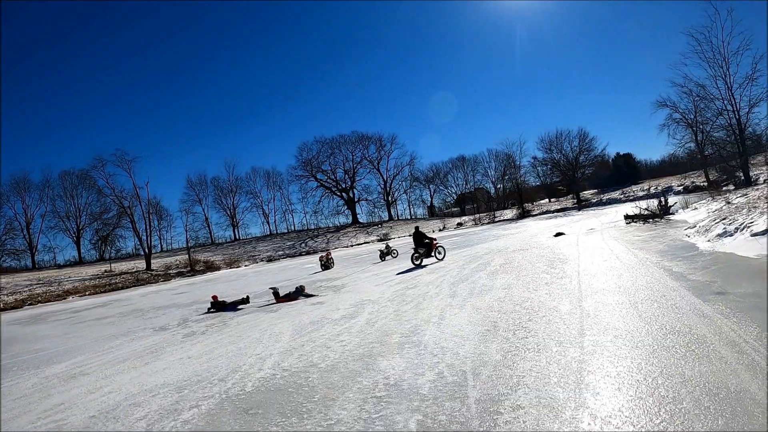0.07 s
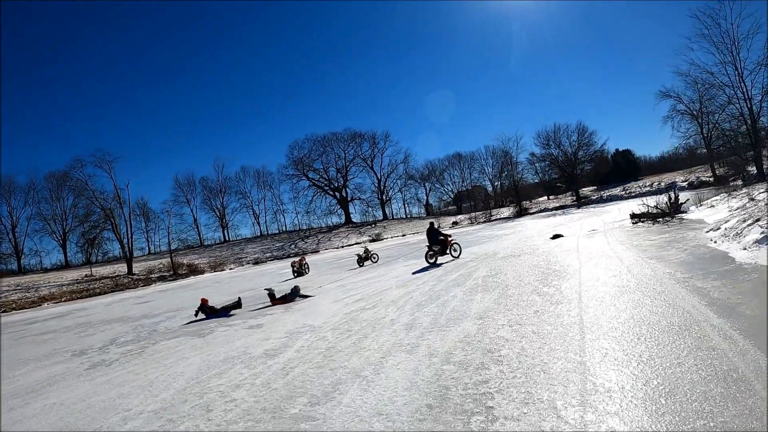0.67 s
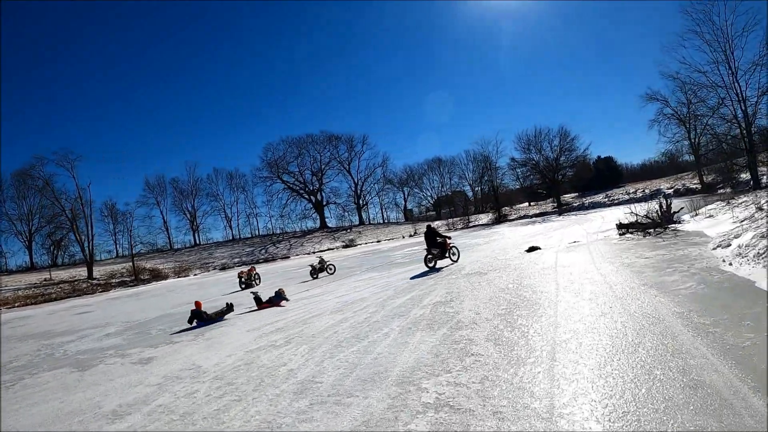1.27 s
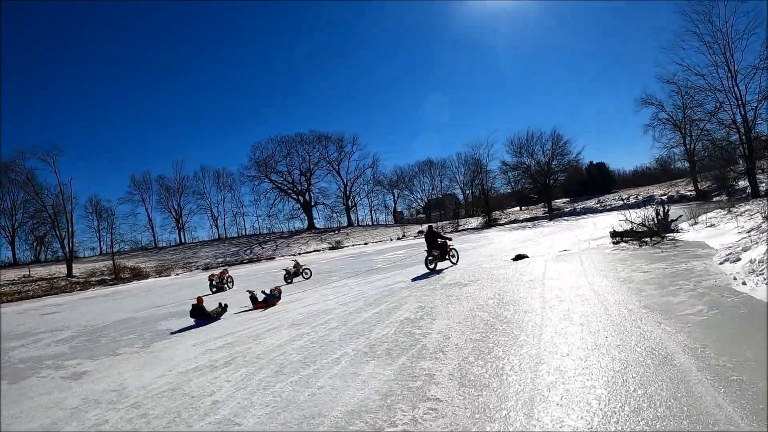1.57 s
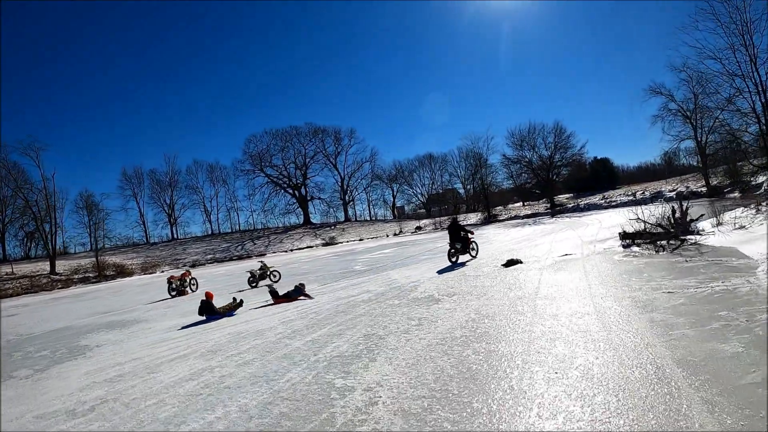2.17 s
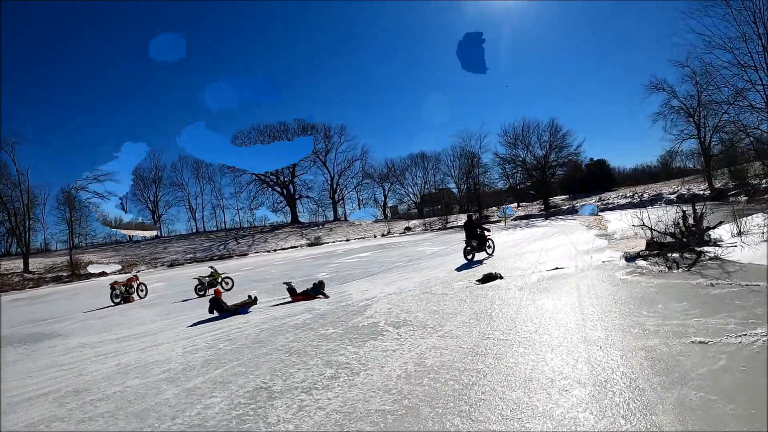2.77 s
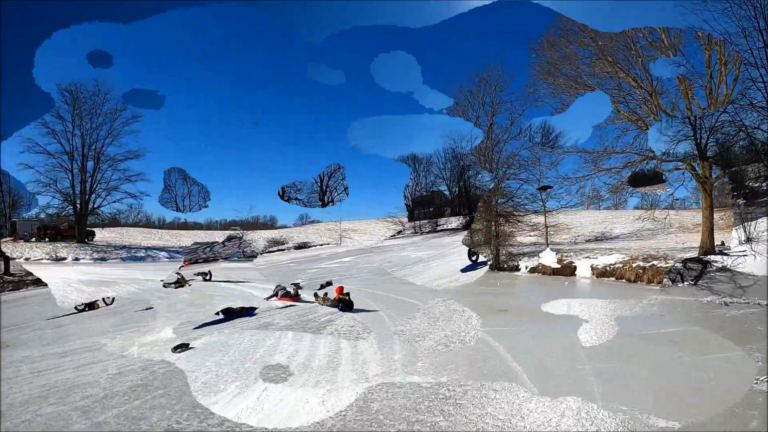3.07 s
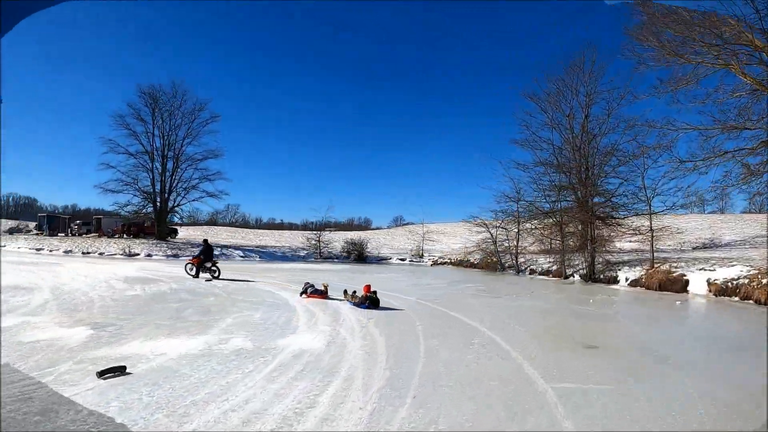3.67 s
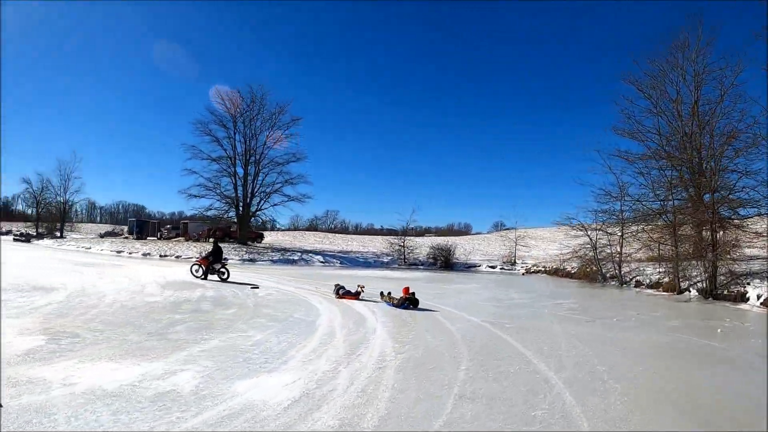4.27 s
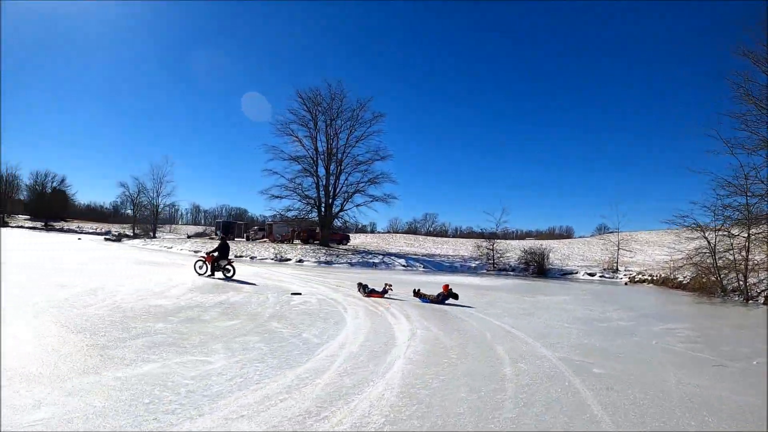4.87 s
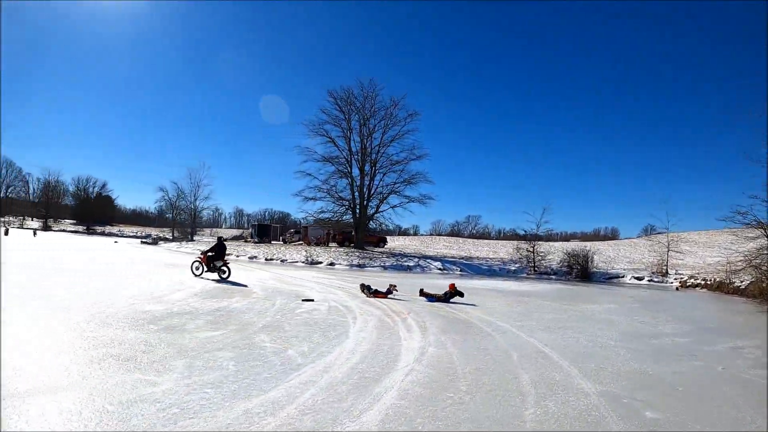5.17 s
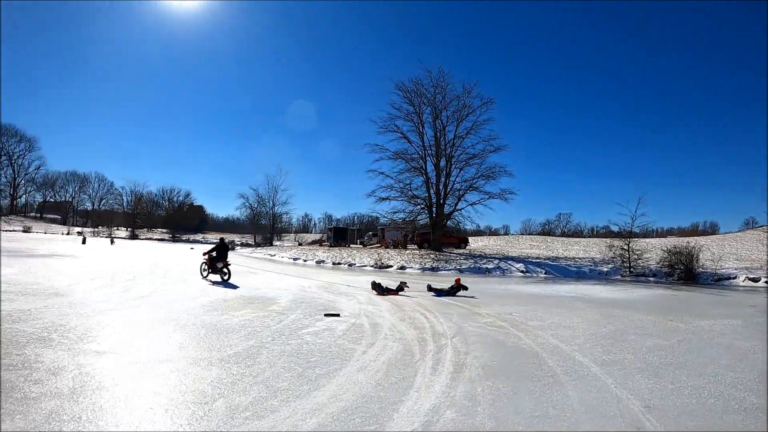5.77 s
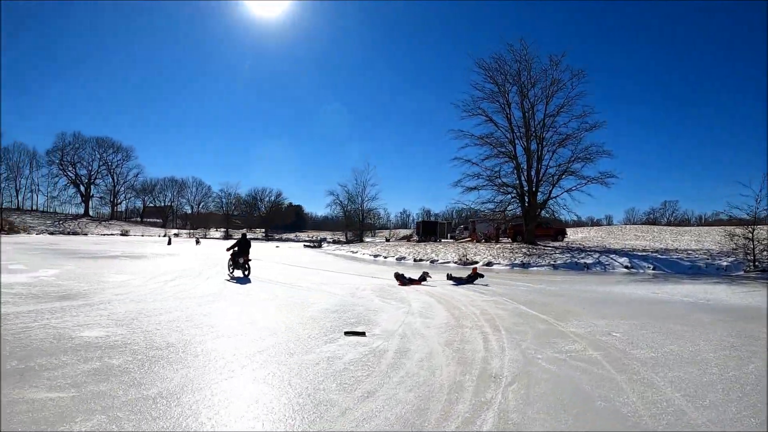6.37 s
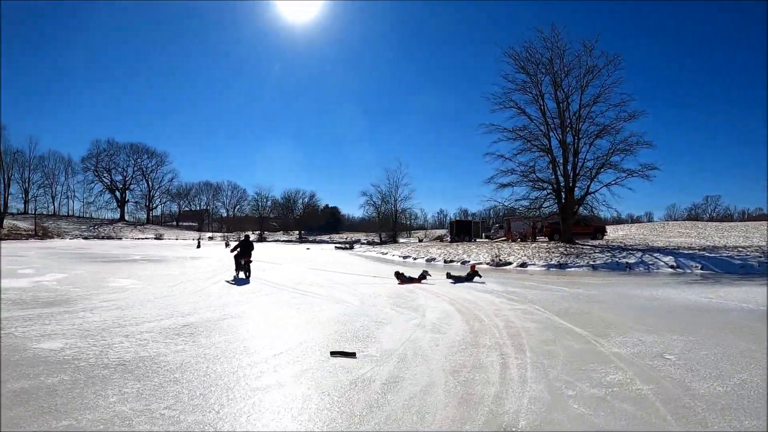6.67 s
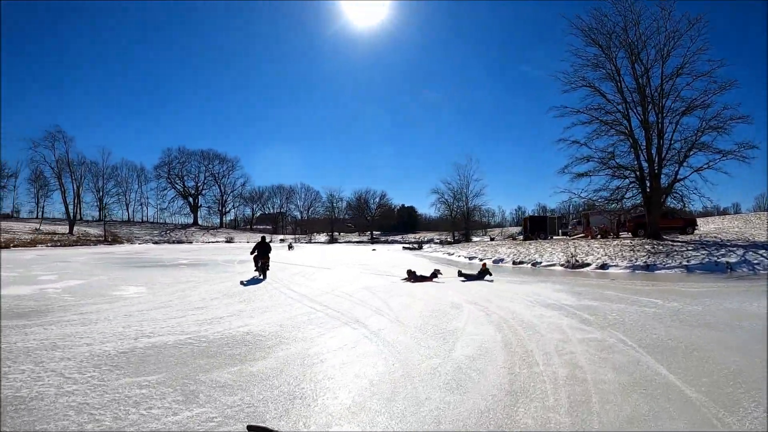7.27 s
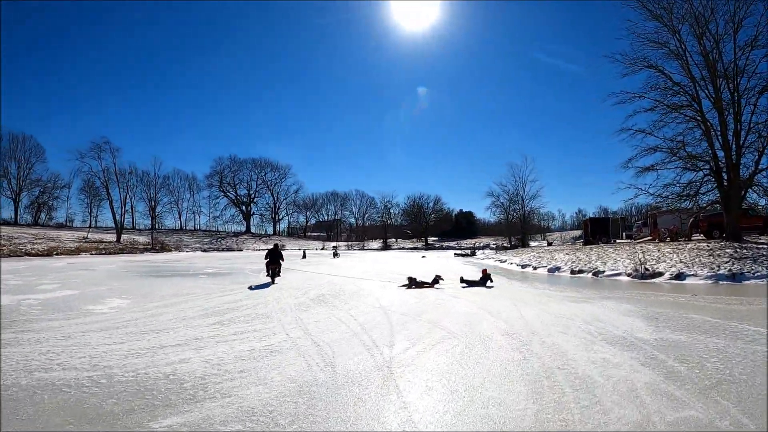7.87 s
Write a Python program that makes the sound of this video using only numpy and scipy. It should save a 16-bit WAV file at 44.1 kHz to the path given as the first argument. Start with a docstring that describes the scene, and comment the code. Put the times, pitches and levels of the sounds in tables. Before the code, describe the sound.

A small motorcycle engine thumps and clatters close up, tyres crunching and squeaking on ice as wind buffets the microphone.

```python
"""A small four-stroke single circles a frozen pond, heard from the rider's seat.
From the start the exhaust thumps about 19 times a second, the engine clatters, and the tyres roar,
crunch and squeak on the ice in a steady wind. Chips snap off, bumps knock the frame, gusts buffet
the microphone. At 2.76 s the ride jumps, with a faint tick, to a faster lap of 22-24 firings a second.
The gusts end soon after 4 s; around 6 s the roar peaks and short tones sink through it."""
import sys
import numpy as np
from scipy import signal
from scipy.fft import rfft, irfft, next_fast_len
from scipy.io import wavfile

SR = 44100
rng = np.random.default_rng(int(sys.argv[2]) if len(sys.argv) > 2 else 0)


def to_wav(s):
    """Save 16-bit WAV."""
    ch = np.atleast_2d(s).T  # columns
    pcm = np.round(np.clip(ch, -1, 1) * 32767)  # PCM
    wavfile.write(sys.argv[1], SR, pcm.astype(np.int16))


N = 353682
TIME_S = np.arange(N) / SR
FFT_SIZE = next_fast_len(N)
BIN_HZ = np.fft.rfftfreq(FFT_SIZE, 1 / SR)
JUMP_S = 2.7563
OPPOSITE_EARS = np.array([[1], [-1]])


def from_db(db):
    """Decibels to gain."""
    return 10 ** (np.asarray(db) / 20)


def unit_rms(x):
    """Scale to unit power."""
    return x / np.sqrt(np.mean(x ** 2) + 1e-20)


def curves(rows):
    """Each value column of a time table at every sample."""
    times_s, *columns = np.transpose(rows)
    return [np.interp(TIME_S, times_s, column) for column in columns]


def per_lap(slow, fast):
    """One value before the jump, another after it."""
    return np.where(TIME_S < JUMP_S, slow, fast)


def swell(start_s, length_s, attack_s, release_s):
    """Trapezoid from 0 to 1, released after length_s, confined to the lap that holds its middle."""
    t = TIME_S - start_s
    on_slow_lap = start_s + length_s / 2 < JUMP_S
    envelope = np.clip(np.minimum(t / attack_s, 1 - (t - length_s) / release_s), 0, 1)
    return envelope * per_lap(on_slow_lap, not on_slow_lap)


def bin_gains(spectrum):
    """A (Hz, dB) table as a gain per frequency bin."""
    hz, db = np.transpose(spectrum)
    return from_db(np.interp(np.log(BIN_HZ + 1), np.log(hz), db))


def coloured(x, spectrum):
    """Filter by a (Hz, dB) table, with steep skirts beyond its ends; unit power."""
    hz = BIN_HZ + 1
    skirts = np.minimum(1, np.minimum(hz / spectrum[0][0], spectrum[-1][0] / hz)) ** 8
    return unit_rms(irfft(rfft(x, FFT_SIZE) * bin_gains(spectrum) * skirts, FFT_SIZE)[..., :N])


def coloured_per_lap(x, slow_spectrum, fast_spectrum):
    """One colour on each lap."""
    return per_lap(coloured(x, slow_spectrum), coloured(x, fast_spectrum))


def drift(rate_hz):
    """Smooth random curve of unit power that changes at about rate_hz."""
    step, settle = 40, 2000
    pole = np.exp(-2 * np.pi * rate_hz * step / SR)
    noise = rng.standard_normal(N // step + settle + 2)
    slow = signal.lfilter([1], [1, -2 * pole, pole * pole], noise)[settle:]
    return np.interp(np.arange(N) / step, np.arange(len(slow)), unit_rms(slow))


def resonance(hz, width_hz):
    """Two-pole band-pass with unit peak gain."""
    r = np.exp(-np.pi * width_hz / SR)
    return np.array([1, 0, -1]) * (1 - r * r) / 2, [1, -2 * r * np.cos(2 * np.pi * hz / SR), r * r]


def moving_ring(drive, hz, width_hz, block=256):
    """A resonance whose centre follows a curve; unit power."""
    out, state = np.zeros((2, N)), np.zeros((2, 2))
    for i in range(0, N, block):
        b, a = resonance(hz[i], width_hz)
        out[:, i:i + block], state = signal.lfilter(b, a, drive[:, i:i + block], zi=state)
    return unit_rms(out)


def impulses(turns):
    """A unit click whenever turns rises past a whole number."""
    return (np.diff(np.floor(turns), prepend=np.floor(turns[0])) > 0) * 1.


def grains(per_s, spread_db):
    """Two independent streams of tiny clicks of uneven size; unit power."""
    sizes = from_db(spread_db * np.minimum(rng.exponential(1, (2, N)), 4))
    signs = rng.choice([-1, 1], (2, N))
    return unit_rms(sizes * signs * (rng.random((2, N)) < per_s / SR))


# Each row: time in seconds, firings per second.
FIRING_RATE = [(0.0, 19.072), (0.7, 18.63), (1.4, 18.226), (2.1, 17.873), (2.75, 17.768), (2.77, 22.109),
               (3.2, 22.486), (3.6, 22.649), (4.1, 22.744), (4.6, 23.33), (5.05, 23.806), (5.5, 23.328),
               (6.0, 23.135), (6.5, 22.862), (6.95, 22.83), (7.3, 22.122), (7.7, 22.019), (8.02, 21.569)]


def engine_cycles(first_firing_cycles=.576, skipped_cycles=.469):
    """Running count of cycles, each one firing and two crank turns; the jump skips part of one."""
    firings_per_s, = curves(FIRING_RATE)
    return np.cumsum(firings_per_s) / SR - first_firing_cycles - per_lap(0, skipped_cycles)


# Each row: time in seconds, relative pulse strength in dB.
THROTTLE_CURVE = [(0, 1.5), (1.2, 1), (2.7, -1.5), (3.3, 0), (3.6, 3), (4.4, 1.7), (5.2, 1.4), (6, -1.5),
                  (6.9, 0.2), (8, 1)]
# Silencer and airbox modes per lap. Each row: centre in Hz, width in Hz, gain in dB, polarity.
SLOW_PIPE_MODES = [(76, 15, 2.8, -1), (110, 45, -6.5, 1), (189, 11, -6.5, -1), (211, 30, -6.5, -1),
                   (260, 120, -0.2, 1)]
FAST_PIPE_MODES = [(82, 10, 2.3, -1), (112, 34, -1.7, 1), (138, 11, -9.4, 1), (226, 32, -2.6, 1),
                   (252, 20, -8, 1), (292, 75, 2.1, -1)]


def exhaust(cycle, gain_db=0.2, puff_s=0.0009, uneven_db=0.4, wander_cycles=0.004):
    """One rounded puff of gas per firing, never quite on time, rings the silencer and airbox."""
    throttle_db, = curves(THROTTLE_CURVE)
    firings = impulses(cycle + wander_cycles * drift(9.2))
    firings *= from_db(gain_db + throttle_db + uneven_db * rng.standard_normal(N))
    puff = np.exp(-.5 * (np.arange(-256, 257) / SR / puff_s) ** 2)
    flow = signal.fftconvolve(firings, puff, "same")

    def pipe(modes):
        return sum(polarity * from_db(db) * signal.lfilter(*resonance(hz, width_hz), flow)
                   for hz, width_hz, db, polarity in modes)

    return per_lap(pipe(SLOW_PIPE_MODES), pipe(FAST_PIPE_MODES))


# Each row: time in seconds, relative level in dB, casing ring in Hz.
CLATTER_CURVE = [(0.0, -28.5, 1053), (0.65, -25, 1026), (1.1, -27, 970), (2.0, -23.5, 966),
                 (2.65, -24.5, 927), (2.9, -24, 950), (3.55, -24, 985), (3.85, -25, 993), (4.5, -24, 1015),
                 (5.7, -21, 1079), (6.35, -22.5, 1060), (6.85, -23, 1014), (8.02, -25, 1072)]
# Each row: frequency in Hz, relative level in dB.
CASING_SPECTRUM = [(650, -18.5), (820, -1.5), (920, 2), (1100, -0.5), (1200, -2.5), (1320, -8),
                   (1600, -12.5)]


def clatter(cycle, gain_db=-0.5, knock_db=-2, whine_db=-8, burst_db=1.4, per_cycle=8, play_cycles=.005):
    """Valves and piston knock at set crank angles, the chain rattles; both ring the whining casing."""
    clatter_db, ring_hz = curves(CLATTER_CURVE)
    offsets = (np.arange(per_cycle) + rng.uniform(-.45, .45, per_cycle)) / per_cycle
    knocks = sum(impulses(cycle + offset + play_cycles * drift(20)) for offset in offsets)
    knocks *= from_db(2 * rng.standard_normal(N))
    impacts = grains(per_s=3000, spread_db=2.5)   # chain
    impacts[0] += from_db(knock_db) * unit_rms(knocks)
    whine = moving_ring(grains(per_s=3000, spread_db=2), ring_hz, width_hz=95)
    rattle = moving_ring(from_db(burst_db * drift(30)) * impacts, ring_hz, width_hz=250)
    casing = coloured(rattle + from_db(whine_db) * whine, CASING_SPECTRUM)
    return from_db(gain_db + clatter_db) * casing / np.std(casing[0])


# Each row: start in seconds, length in seconds, scrape loss in dB.
SMOOTH_PATCHES = [(1.988, 0.65, 4), (6.551, 0.73, 5)]


def smooth_loss_db(release_s):
    """Scrape lost while the tyre runs over smooth ice."""
    return sum(db * swell(start_s, length_s, attack_s=0.17, release_s=release_s)
               for start_s, length_s, db in SMOOTH_PATCHES)


def dulled(crunch, corner_hz=1550):
    """Smooth ice takes the top off the crunch, which is slow to return."""
    low = signal.sosfiltfilt(signal.butter(6, corner_hz, fs=SR, output="sos"), crunch)
    return low + (crunch - low) * from_db(-1.75 * smooth_loss_db(release_s=1))


# Each row: start in seconds, length in seconds, scrape level in dB, spray level in dB.
TYRE_SLIDES = [(-0.1, 0.92, -42.5, -55), (0.317, 0.25, -42.5, -51.5), (1.38, 0.06, -48, -54.5),
               (1.589, 0.19, -44, -52), (1.625, 0.16, -44.5, -53), (1.824, 0.11, -40.5, -53),
               (2.603, 2.4, -63, -53.5), (5.723, 0.25, -49, -59.5), (7.299, 0.53, -53.5, -63.5)]


def bite(sag_db_per_s=1.5, crunch_over_scrape_db=2.5):
    """Crunch, scrape and spray gains: down on smooth ice, up in slides; drive lifts the first two."""
    clatter_db, _ = curves(CLATTER_CURVE)
    drive_db = clatter_db - clatter_db.mean()
    loss_db = smooth_loss_db(release_s=0.45)
    crunch = from_db(per_lap(-36, -33) + 0.76 * drive_db - 0.22 * loss_db)
    scrape = from_db(per_lap(-47.5, -47) + 0.34 * drive_db - loss_db)
    spray = from_db(per_lap(-58, -58.5) - 0.71 * loss_db)
    for start_s, length_s, scrape_db, spray_db in TYRE_SLIDES:
        slide = swell(start_s, length_s, attack_s=.06, release_s=0.13)
        slide *= from_db(-sag_db_per_s * (TIME_S - start_s))
        crunch = np.hypot(crunch, slide * from_db(scrape_db + crunch_over_scrape_db))
        scrape = np.hypot(scrape, slide * from_db(scrape_db))
        spray = np.hypot(spray, slide * from_db(spray_db))
    return crunch, scrape, spray


# Each row: time in seconds, tread roar level in dB.
ROAR_CURVE = [(0.0, -26.5), (0.85, -29.5), (1.1, -34.5), (1.9, -28.5), (2.6, -32), (2.8, -28.5),
              (4.4, -24.5), (6.0, -20.5), (6.6, -22), (7.1, -24.5), (8.02, -20.5)]
# Tyre noise on ice; SLOW and FAST are the laps. Each row: frequency in Hz, relative level in dB.
SLOW_ROAR_SPECTRUM = [(310, -17.5), (390, -5), (480, -4.5), (620, 1.5), (730, 2.5), (840, -2), (1000, -17)]
FAST_ROAR_SPECTRUM = [(310, -11), (390, -8.5), (470, -1.5), (600, 3), (730, 2), (850, -4), (1000, -9)]
SLOW_CRUNCH_SPECTRUM = [(1100, -9.5), (1320, -0.5), (1550, 1.5), (1900, 4.5), (2080, -4), (2250, -11.5),
                        (2500, -24)]
FAST_CRUNCH_SPECTRUM = [(1100, -17), (1320, -1.5), (1600, -1.5), (1880, -1.5), (2030, -8.5), (2250, -18.5),
                        (2500, -26)]
SCRAPE_SPECTRUM = [(2100, -14.5), (2450, -8.5), (2750, -1.5), (3000, 4), (3300, 4), (3600, 1.5), (3850, -2),
                   (4100, -18.5)]
SLOW_SPRAY_SPECTRUM = [(3800, -20), (4050, -7.5), (4250, 4), (4500, -1), (4700, 1.5), (5050, -5),
                       (5300, -5), (5600, -8), (5900, -7), (6400, -16.5), (8000, -31.5), (12000, -38)]
FAST_SPRAY_SPECTRUM = [(3800, -24), (4050, -3.5), (4250, 3), (4500, 0), (4700, 4.5), (5000, 0.5),
                       (5250, -8.5), (6000, -10.5), (6800, -11.5), (8000, -31), (10000, -30),
                       (12000, -32.5), (14000, -43.5)]
HISS_SPECTRUM = [(7000, -7), (8800, 2), (10500, -2.5), (12000, -6), (14000, -13)]


def tyres(cycle, surge_depth=0.064, patchy_db=0.85, clump_db=0.83, hiss_db=-80.5):
    """The tread drums on the ice, crushes its crust and throws off fine chips."""
    roar_db, = curves(ROAR_CURVE)
    crunch_gain, scrape_gain, spray_gain = bite()
    tread = grains(per_s=2500, spread_db=1.5)
    roar = from_db(roar_db) * coloured_per_lap(tread, SLOW_ROAR_SPECTRUM, FAST_ROAR_SPECTRUM)
    crust = grains(per_s=4500, spread_db=3)
    crunch = crunch_gain * dulled(coloured_per_lap(crust, SLOW_CRUNCH_SPECTRUM, FAST_CRUNCH_SPECTRUM))
    chips = grains(per_s=9000, spread_db=2.5)
    scrape = scrape_gain * coloured(chips, SCRAPE_SPECTRUM)
    spray = spray_gain * coloured_per_lap(chips, SLOW_SPRAY_SPECTRUM, FAST_SPRAY_SPECTRUM)
    hiss = from_db(hiss_db) * np.sqrt(spray_gain / spray_gain.mean()) * coloured(chips, HISS_SPECTRUM)
    crank_surge = 1 + surge_depth * np.cos(4 * np.pi * cycle)
    grip = crank_surge * from_db(patchy_db * drift(14))
    clumps = unit_rms(from_db(clump_db * drift(70)))
    return grip * (roar + crunch + clumps * (scrape + spray) + hiss)


# Steady wind. Each row: frequency in Hz, relative level in dB.
RUMBLE_SPECTRUM = [(12, -12.5), (24, -4.5), (42, -1), (62, -5), (90, -4), (130, -19)]
FLUTTER_SPECTRUM = [(90, -12.5), (118, -1), (160, -5), (200, -2.5), (250, -6.5), (310, -6.5), (380, -10),
                    (480, -11.5)]


def riding_wind(flutter_db=1.5):
    """Air streams past, stronger on the fast lap: a steady rumble under a quick flutter."""
    rumble = from_db(per_lap(-27, -24.5)) * coloured(rng.standard_normal((2, N)), RUMBLE_SPECTRUM)
    flutter_gain = from_db(per_lap(-27.5, -25.5) + flutter_db * drift(29))
    return rumble + flutter_gain * coloured(rng.standard_normal((2, N)), FLUTTER_SPECTRUM)


# Each row: start in seconds, length in seconds, first and last pitch in Hz, width in Hz, level in dB.
SQUEAL_EVENTS = [(0.05, 0.85, 4260, 4240, 45, -53), (0.46, 0.16, 2070, 2070, 12, -46),
                 (1.08, 0.4, 930, 945, 35, -34), (1.62, 0.2, 3480, 3400, 150, -39.5),
                 (4.3, 0.62, 4710, 4640, 100, -55), (4.85, 0.45, 1025, 1040, 55, -27),
                 (5.36, 0.42, 1050, 1080, 65, -21.5), (5.48, 0.28, 1620, 1595, 45, -36),
                 (5.6, 0.08, 3040, 3440, 80, -46.5), (5.7, 0.2, 4180, 4210, 40, -60),
                 (7.2, 0.7, 4350, 4500, 150, -59), (7.66, 0.28, 1810, 1820, 15, -48)]


def squeals(fade_share=.4):
    """Rough, unsteady resonances swell out of the clatter and scrape, then fade."""
    out = np.zeros(N)
    for start_s, length_s, first_hz, last_hz, width_hz, db in SQUEAL_EVENTS:
        fade_s = fade_share * length_s
        hz = np.interp(TIME_S, [start_s, start_s + length_s + fade_s], [first_hz, last_hz])
        phase = 2 * np.pi * np.cumsum(hz) / SR
        rough_tone = drift(width_hz) * np.cos(phase) + drift(width_hz) * np.sin(phase)
        out += from_db(db) * swell(start_s, length_s, fade_s, fade_s) * rough_tone
    return out


# Each row: start in seconds, level in dB before the band-pass.
ICE_CRACKS = [(0.140, -27), (0.283, -24.5), (0.575, -24), (0.596, -24), (0.898, -31), (1.444, -29.5),
              (1.613, -27), (1.654, -23), (1.763, -23.5), (1.893, -25), (2.737, -34), (2.772, -32),
              (2.848, -31.5), (3.144, -32), (3.755, -30), (4.238, -29)]


def ice_cracks(t60_s=.04, band_hz=(2800, 4900)):
    """Larger chips snap off one by one, each a brief burst of noise."""
    out, t = np.zeros((2, N)), np.arange(SR // 20) / SR
    for start_s, db in ICE_CRACKS:
        i = int(start_s * SR)
        out[:, i:i + len(t)] += from_db(db - 60 * t / t60_s) * rng.standard_normal((2, len(t)))
    return signal.sosfilt(signal.butter(3, band_hz, "band", fs=SR, output="sos"), out)


# Each row: start in seconds, pitch in Hz, peak in dB before the low-pass, T60 in seconds.
FRAME_KNOCKS = [(0.653, 530, -12, 0.03), (0.661, 365, -11.5, 0.024), (0.831, 870, -10.5, 0.013),
                (1.192, 894, -13, .039), (3.052, 267, -8, 0.041)]


def frame_knocks(top_hz=1300):
    """Bumps jolt the frame, each a dull, quickly damped ring."""
    out, t = np.zeros(N), np.arange(SR // 10) / SR
    for start_s, hz, db, t60_s in FRAME_KNOCKS:
        i = int(start_s * SR)
        out[i:i + len(t)] += from_db(db - 60 * t / t60_s) * np.sin(2 * np.pi * hz * t)
    return signal.sosfilt(signal.butter(4, top_hz, fs=SR, output="sos"), out)


# Each row: start in seconds, length in seconds, then buffet, rush and blast levels in dB.
GUST_EVENTS = [(0.862, 0.6, -27.5, -22.5, -34), (1.462, 0.19, -25.5, -18.5, -28.5),
               (1.65, 0.27, -28, -20.5, -30.5), (1.899, 0.73, -25, -24, -41.5),
               (2.167, 0.25, -22, -21.5, -25.5), (2.745, 0.15, -17, -17.5, -26),
               (2.872, 0.17, -16.5, -21, -30), (3.026, 0.088, -20.5, -19.5, -32),
               (3.167, 0.12, -15.5, -23.5, -31.5), (3.376, 0.27, -19, -17.5, -29.5),
               (3.65, 0.13, -19, -17, -30), (3.808, 0.22, -18, -21, -32), (4.056, 0.16, -16, -21.5, -31)]
# Low, middle and upper gust bands. Each row: frequency in Hz, relative level in dB.
BUFFET_SPECTRUM = [(12, -16.5), (24, -5.5), (45, -6.5), (68, 3.5), (95, -2.5), (130, -14.5)]
RUSH_SPECTRUM = [(90, -17.5), (122, 1.5), (155, -2), (190, -2.5), (245, -3.5), (310, -7.5), (380, -15.5),
                 (480, -14)]
BLAST_SPECTRUM = [(300, -2.5), (400, 2.5), (520, 0.5), (700, -3.5), (1000, -14.5)]


def gusts(attack_s=0.036, release_s=0.069, flutter_db=1.5, side_buffet_db=-21.5, side_flutter_db=-12.5):
    """Eddies hit the microphone: heavy buffeting under a quick flutter; returns mid and side."""
    band_power = sum(np.outer(from_db(levels_db), swell(start_s, length_s, attack_s, release_s)) ** 2
                     for start_s, length_s, *levels_db in GUST_EVENTS)
    buffet_gain, rush_gain, blast_gain = np.sqrt(band_power)
    eddies = rng.standard_normal((3, 2, N))
    buffet = buffet_gain * coloured(eddies[0], BUFFET_SPECTRUM)
    rush = rush_gain * coloured(eddies[1], RUSH_SPECTRUM)
    blast = blast_gain * coloured(eddies[2], BLAST_SPECTRUM)
    flutter = (rush + blast) * from_db(flutter_db * drift(29))
    side = from_db(side_buffet_db) * buffet[1] + from_db(side_flutter_db) * flutter[1]
    return buffet[0] + flutter[0], side


def jump_tick(peak_db=-15.5, decay_per_sample=0.84):
    """A small drop in pressure at the jump, the same in both ears."""
    click = (np.arange(N) == round(JUMP_S * SR)) * from_db(peak_db)
    return signal.lfilter([-1], [1, -decay_per_sample], click)


def sinking_tones(count=1600, low_hz=538.7, high_hz=1141, tone_s=.22, fall_hz_per_s=220, level_db=-23.5):
    """Short random tones sink in pitch, heard only around the height of the roar."""
    t = np.arange(int(tone_s * SR)) / SR
    out = np.zeros(N + len(t))
    for time_share, pitch_share in rng.random((count, 2)):
        i = int(time_share * N)
        first_hz = low_hz + pitch_share * (high_hz - low_hz)
        phase = 2 * np.pi * (first_hz - fall_hz_per_s * t / 2) * t
        out[i:i + len(t)] += np.hanning(len(t)) * np.sin(phase)
    envelope = swell(start_s=5.65, length_s=1.5, attack_s=0.51, release_s=0.76)
    return from_db(level_db) * envelope * unit_rms(out[:N])


# Each row: frequency in Hz, side minus mid in dB.
PORT_WIDTH = [(30, -16), (70, -24), (150, -25), (260, -27), (400, -24), (700, -15), (1300, -18),
              (1900, -9.5), (2450, 2.5), (3300, -5.5), (3900, -0.5), (4400, 2.5), (5400, 4), (7400, 2),
              (8300, 2.5), (11500, -5)]
# Each row: frequency in Hz, left minus right in dB.
PORT_BALANCE = [(60, 0.6), (140, 0.5), (260, 1), (450, 1), (700, 3), (1350, 1), (1900, -1), (2700, 8.5),
                (3500, 7.5), (4400, -6.5), (5400, -6.5), (7500, 3), (11000, 12)]
# Each row: frequency in Hz, share of the remaining side power that is a steady phase shift.
PORT_STEADY_SHARE = [(80, 0.86), (300, 0.81), (1000, .6), (2500, .65), (4500, .55), (8000, .25)]


def microphone_ports(direct, diffuse):
    """Two ports in one housing agree in the bass and differ in level and phase in the treble."""
    width, power_ratio = bin_gains(PORT_WIDTH), bin_gains(PORT_BALANCE) ** 2
    in_phase = (1 + width ** 2) / 2 * (power_ratio - 1) / (power_ratio + 1)
    remaining = np.sqrt(np.maximum(width ** 2 - in_phase ** 2, 0))
    steady_share = np.interp(BIN_HZ, *np.transpose(PORT_STEADY_SHARE))
    side = rfft(direct, FFT_SIZE) * (in_phase - 1j * remaining * np.sqrt(steady_share))
    side += rfft(diffuse, FFT_SIZE) * remaining * np.sqrt(1 - steady_share)
    return direct + irfft(side, FFT_SIZE)[:N] * OPPOSITE_EARS


def scene():
    """The crank times exhaust, clatter and grip; wind blows over all, and gusts differ between ports."""
    cycle = engine_cycles()
    direct, diffuse = clatter(cycle) + tyres(cycle) + ice_cracks() + riding_wind()
    gust_mid, gust_side = gusts()
    direct += exhaust(cycle) + squeals() + frame_knocks() + gust_mid + sinking_tones()
    return microphone_ports(direct, diffuse) + gust_side * OPPOSITE_EARS + jump_tick()


def record(dry):
    """Clip at full scale, then low-pass with the stopband from 15.8 kHz."""
    return signal.sosfilt(signal.cheby2(12, 70, 15800, fs=SR, output="sos"), np.clip(dry, -1, 1))


dry = scene()
out = record(dry)
to_wav(out)
```